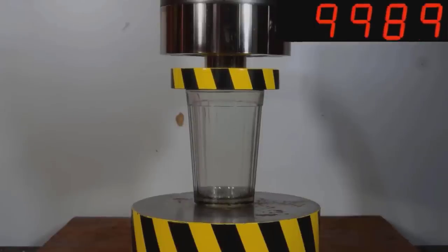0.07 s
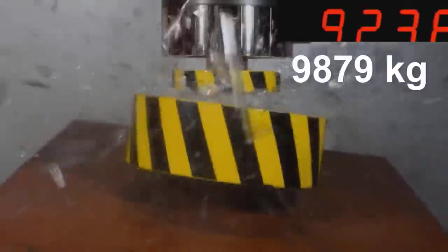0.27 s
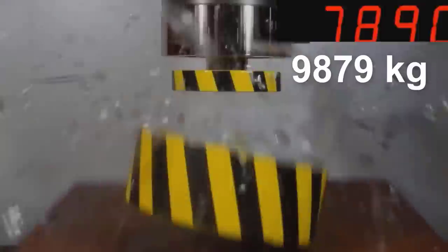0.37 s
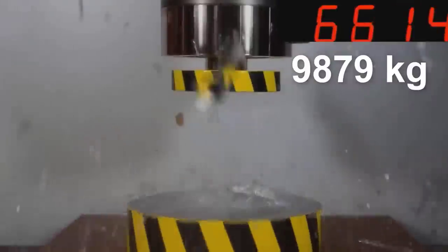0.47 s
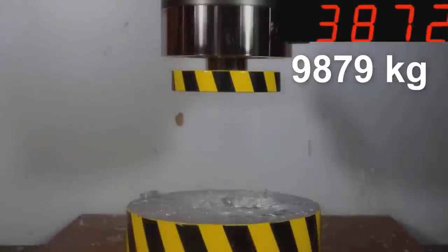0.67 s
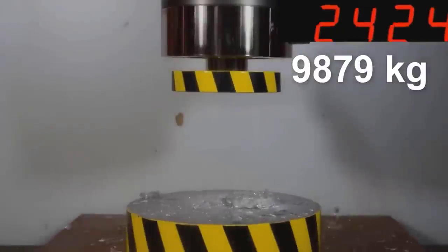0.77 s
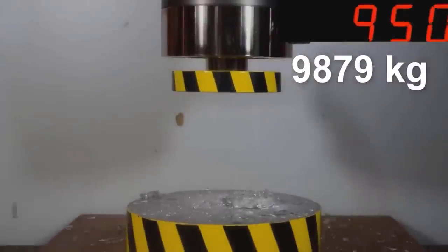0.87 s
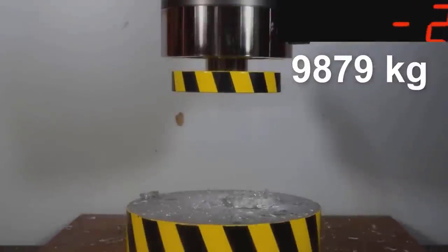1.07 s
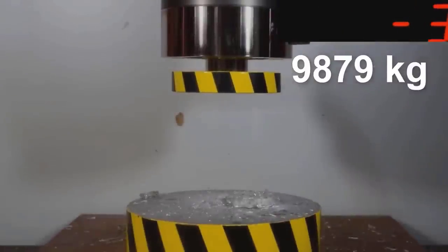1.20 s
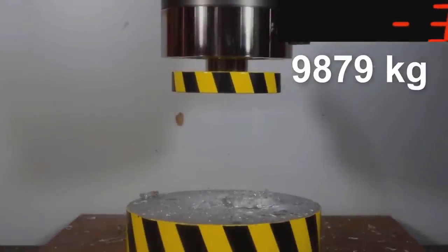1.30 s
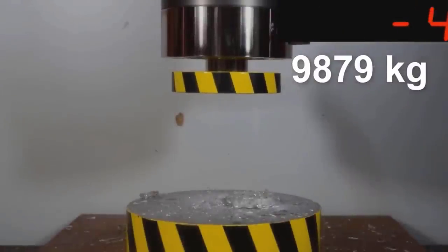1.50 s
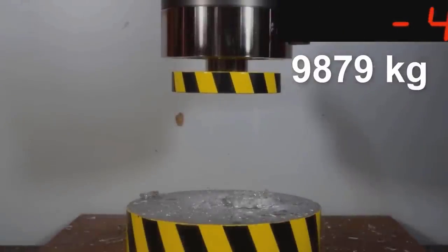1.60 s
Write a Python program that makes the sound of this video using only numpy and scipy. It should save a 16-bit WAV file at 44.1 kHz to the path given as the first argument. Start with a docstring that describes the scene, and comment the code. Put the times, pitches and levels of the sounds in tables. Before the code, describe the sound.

Close microphone in a reverberant workshop: quiet machine hum, sudden violent glass shatter that clips, quick rebounding metallic thuds, a dense bright spray of fragments, then sparse small clicks and faint glassy tinkles.

```python
"""A workshop press hums with soft knocks, then a thick glass cup bursts and overloads the microphone.
Noise bursts make the blows, and wavering tones make the steel frame boom and ring.
Thousands of short grains make a shower of shards, which also rings the platen.
The last pieces tick (bands of noise) and tinkle (single tones) while the room dies away.
Under it all lie the hum (shaped noise) and faint steady tones of the press."""
import sys
import numpy as np
from scipy import signal
from scipy.fft import rfft, irfft
from scipy.io import wavfile
from scipy.ndimage import uniform_filter1d

SR = 44100
rng = np.random.default_rng(int(sys.argv[2]) if len(sys.argv) > 2 else 0)


def file_out(sig):
    """Save sig as 16-bit WAV at sys.argv[1]."""
    # one column per channel
    cols = np.atleast_2d(sig).T
    # limit, then scale
    lim = np.clip(cols, -1, 1)
    pcm = np.round(lim * 32767).astype(np.int16)
    wavfile.write(sys.argv[1], SR, pcm)


N = 72765  # length in samples
T = np.arange(N) / SR  # time in s

# Heavy blows: burst, rebound, heap landing, thud on the bench
# [t/s, bang level/dB, treble tilt/dB per octave, frame ring level/dB, ring centre f/Hz]
BLOWS = [(0.2412, 1, 0, -6, 434), (0.399, -11.5, 2, -7.5, 833), (0.483, -4.5, 2, -14.5, 1610),
         (0.549, -12.5, -5.5, -19.5, 336)]
# Tone colour of every bang [f/Hz, relative level/dB]
BANG_SPECTRUM = [(18, -59), (40, -45), (100, -19.5), (200, -11.5), (350, -3), (540, -11), (905, -10),
                 (1560, -12.5), (4000, -23), (15000, -97)]
BLOW_T60 = 0.13  # s to fall by 60 dB
# Ringing tones of the steel frame [f/Hz, level/dB, time to fall 60 dB/s]
FRAME_MODES = [(222, -9, .4), (290, -11, 1.1), (354, -5, .3), (424, 2, .42), (474, -15, 1.3),
               (705, -13, .8), (793, 0, .4), (933, 3, .4), (1210, -3, .7), (1549, -5, .9), (1598, -4, .6),
               (1847, -5, 1.1), (1869, -8, 1.2), (2073, -11, .3), (2299, -13, .5), (2755, -17, .6)]
RING_FALL_DB = 8  # weaker by this much per octave away from a blow's ring centre
FRAME_WAVER, FRAME_WAVER_S = 0.35, 0.03  # depth of the beating; smoothing time in s

# Loudness of the falling shards over time [t/s, level/dB]
SHOWER_LEVEL = [(.24, -20), (.34, -34), (.39, -57), (.41, -33), (.47, -26.5), (.505, -10.5), (.56, -10.5),
                (.65, -24), (.76, -43.5), (.86, -37.5), (1.04, -37), (1.15, -44.5), (1.3, -49.5),
                (1.45, -54.5), (1.65, -62)]
# Tone colour of the glass grains [f/Hz, relative level/dB per Hz]
GLASS_SPECTRUM = [(700, -15.5), (1700, -0.5), (2700, -4), (3800, -8.5), (5000, -13), (7700, -16),
                  (11000, -17.5), (15500, -40)]
SHARDS_PER_S, SIZE_DB = 6000, 1.5  # mean rate; scale of the random size, in dB
GRAIN_PITCHES, GRAIN_CYCLES = 48, 6.8  # number of pitches; cycles to fade to 1/e
# Ringing tones of the platen [f/Hz, relative level/dB, time to fall 60 dB/s]
PLATEN_MODES = [(3472, -6, .1), (3612, 1, .14), (4027, -1, .15), (4355, -2, .14), (4790, -8, .12),
                (5453, -8, .12), (6207, -7, .13), (6578, -8, .14), (7420, -10, .1), (7682, -8, .14),
                (7784, -3, .12), (8193, -11, .12), (8480, -11, .1), (9453, -9, .1), (9647, -10, .12),
                (9895, -13, .1), (10560, -12, .1), (10870, -13, .1), (11690, -14, .1), (11950, -14, .08),
                (12170, -8, .12)]
PLATEN_DB = -7  # ring against the shower level

# Single pieces that snap or land [t/s, level/dB, centre f/Hz, time to fall 60 dB/s]
TICKS = [(.2455, -12, 8000, .008), (.2848, -11, 9500, .01), (.308, -11, 5800, .01), (.3356, -9, 7000, .012),
         (1.0, -43, 6000, .06), (1.08, -45, 9000, .05), (1.186, -37, 3500, .04), (1.283, -41, 3500, .07),
         (1.363, -38, 3300, .06), (1.368, -38, 1000, .08), (1.379, -36, 950, .08), (1.389, -36, 1050, .05),
         (1.446, -50, 6000, .04), (1.452, -46, 900, .04), (1.521, -43, 3200, .09), (1.521, -52, 9500, .07)]
# Small shards that ring [t/s, level/dB, f/Hz, time to fall 60 dB/s]
TINKLES = [(.4, -26, 11830, .09), (.4, -28, 8926, .1), (.4, -31, 10050, .1), (.78, -50, 12300, .15),
           (.89, -45, 10600, .16), (.93, -42, 11100, .14), (1.002, -45, 8180, .2), (1.005, -46, 10980, .16),
           (1.05, -48, 10700, .1), (1.285, -47, 2800, .08), (1.46, -63, 7600, .14), (1.49, -67, 11500, .14),
           (1.524, -52, 3680, .06), (1.6, -66, 10700, .14)]
TICK_WIDTH = 0.95  # band runs from centre / 1.95 to centre * 1.95
RISE_SHARE = 0.054  # rise time as a share of the 60 dB fall time
TINKLE_WAVER, TINKLE_WAVER_S = 0.7, 0.006  # depth of the beating; smoothing time in s

# Tone colour of the press hum [f/Hz, relative level/dB per Hz]
HUM_SPECTRUM = [(25, -46), (80, -23), (150, -4.5), (230, -9.5), (380, 3.5), (600, -7), (960, -8),
                (1900, -13), (3200, -27.5), (7000, -34.5), (12000, -45), (14000, -64)]
HUM_DB = -60
# Soft knocks of the press under load [t/s, level over the hum/dB, halved in strength when added]
KNOCKS = [(0.016, 16), (0.087, 16), (0.174, 12)]
KNOCK_S = 0.038  # s for a knock to fade to 1/e
# Steady tones of pump and electronics [f/Hz, rms level/dB]
WHINE = [(156, -79.5), (404, -71.5), (958, -67.5), (6783, -98), (12026, -86)]

# How slowly the room dies away [f/Hz, time to fall 60 dB/s]
ROOM_T60 = [(60, 0.43), (120, 0.2), (220, 1.03), (500, 1.45), (1500, 1.076), (4000, 0.87), (8000, 0.63),
            (15000, 0.54)]
BANG_WET_DB, RING_WET_DB, SHARD_WET_DB = 0, -12, -5.5  # share of each sound sent to the room
CEILING, KNEE = 0.23, 3.4  # overload limit; a higher knee makes a sharper bend
LOW_CUT_HZ, HIGH_CUT_HZ = 23, 15150


def blows():
    """Each blow is a wide burst of noise and rings the frame, most near its own centre."""
    bang = np.zeros(N)
    for start, db, tilt_db, _, _ in BLOWS:
        bang += amp(db) * coloured(BANG_SPECTRUM, tilt_db) * dying(start, BLOW_T60)

    ring = np.zeros(N)
    for hz, mode_db, t60 in FRAME_MODES:
        struck = np.zeros(N)
        for start, _, _, ring_db, centre_hz in BLOWS:
            octaves_away = abs(np.log2(hz / centre_hz))
            struck += amp(ring_db - RING_FALL_DB * octaves_away) * dying(start, t60)
        ring += amp(mode_db) * struck * wavering(hz, FRAME_WAVER, FRAME_WAVER_S)
    return bang, ring


def shower():
    """Thousands of short glassy grains of random pitch; their taps also ring the platen."""
    burst_time = BLOWS[0][0]
    level = amp(np.interp(T, *np.transpose(SHOWER_LEVEL))) * (T > burst_time)

    # Each tap has a random size (capped), moment and sign.
    size = amp(SIZE_DB * np.minimum(rng.exponential(1, N), 4))
    happens = rng.random(N) < SHARDS_PER_S / SR
    taps = size * happens * rng.choice([-1, 1], N)

    pitch_number = rng.integers(0, GRAIN_PITCHES, N)
    pitches = np.geomspace(GLASS_SPECTRUM[0][0], GLASS_SPECTRUM[-1][0], GRAIN_PITCHES)
    grains = np.zeros(N)
    t = T[:2048]
    for k, hz in enumerate(pitches):
        fade = np.exp(-t * hz / GRAIN_CYCLES)
        grain = amp(read(GLASS_SPECTRUM, hz)) * hz * fade * np.sin(2 * np.pi * hz * t)
        grains += signal.oaconvolve(taps * (pitch_number == k), grain)[:N]

    ring = rung(level * taps, PLATEN_MODES)
    ring *= np.linalg.norm(level) / np.linalg.norm(ring)
    return level * evened(grains) + amp(PLATEN_DB) * ring


def pieces():
    """Ticks are short bands of noise, tinkles single dying tones that waver."""
    out = np.zeros(N)
    for start, db, hz, t60 in TICKS:
        edges = [hz / (1 + TICK_WIDTH), min(hz * (1 + TICK_WIDTH), 20000)]
        band = signal.butter(2, edges, "bandpass", fs=SR)
        noise = evened(signal.lfilter(*band, rng.standard_normal(N)))
        out += amp(db) * dying(start, t60) * rising(start, RISE_SHARE * t60) * noise
    for start, db, hz, t60 in TINKLES:
        tone = wavering(hz, TINKLE_WAVER, TINKLE_WAVER_S)
        out += amp(db) * dying(start, t60) * rising(start, RISE_SHARE * t60) * tone
    return out


def press():
    """Low noise hum that swells with soft knocks, and faint steady tones."""
    swell = np.ones(N)
    for start, db in KNOCKS:
        # ln(1000) turns the time to 1/e into the time to fall 60 dB.
        swell += amp(db) * dying(start, KNOCK_S * np.log(1000)) * rising(start, 0.005) / 2
    out = amp(HUM_DB) * coloured(HUM_SPECTRUM) * swell
    for hz, db in WHINE:
        # The root of 2 turns an rms level into a peak.
        out += np.sqrt(2) * amp(db) * np.sin(2 * np.pi * (hz * T + rng.random()))
    return out


def room(x):
    """Echoes as a noise tail of energy 1, each band dying at its own speed."""
    hz, t, bands = signal.stft(rng.standard_normal(N), SR, nperseg=256)
    fade = amp(-60 * t / read(ROOM_T60, hz)[:, None])
    tail = signal.istft(bands * fade, SR, nperseg=256)[1][:N]
    tail *= rising(0, 0.0063)
    return signal.fftconvolve(x, tail / np.linalg.norm(tail))[:N]


def rung(x, modes):
    """The sound of x striking an object: every mode is a dying sine."""
    response = np.zeros(N)
    for hz, db, t60 in modes:
        response += amp(db) * dying(0, t60) * np.sin(2 * np.pi * hz * T)
    return signal.fftconvolve(x, response)[:N]


def wavering(hz, depth, smooth_s):
    """A tone whose strength and phase drift, as close modes beating."""
    width = int(smooth_s * SR)
    drift = uniform_filter1d(rng.standard_normal((2, N)), width)
    drift = uniform_filter1d(drift, width)
    strength = 1 + depth * (evened(drift[0]) + 1j * evened(drift[1]))
    return (strength * np.exp(2j * np.pi * hz * T)).imag


def coloured(spectrum, tilt_db=0.):
    """Noise of rms 1 with the given spectrum, tilted by tilt_db per octave around 1 kHz."""
    hz = np.fft.rfftfreq(N, 1 / SR)
    tilt = tilt_db * np.log2(hz / 1000 + 0.0089)  # the small number avoids log of 0
    gain = amp(read(spectrum, hz) + tilt)
    return evened(irfft(rfft(rng.standard_normal(N)) * gain, N))


def dying(start, t60):
    """Silent before start, then falling 60 dB in t60 seconds."""
    return (T >= start) * amp(-60 * np.maximum(T - start, 0) / t60)


def rising(start, rise_s):
    """A straight climb from 0 to 1 that softens an attack."""
    return np.clip((T - start) / rise_s, 0, 1)


def read(points, hz):
    """Look up a table between its points, on a logarithmic frequency scale."""
    f, value = np.transpose(points)
    return np.interp(np.log(hz + 1), np.log(f + 1), value)


def amp(db):
    """Turn decibels into a plain multiplier."""
    return 10 ** (np.asarray(db) / 20)


def evened(x):
    """Scale a sound to rms 1."""
    return x / np.sqrt(np.mean(x ** 2) + 1e-20)


def scene():
    """Add the direct sounds, their room echoes and the press."""
    bang, ring = blows()
    glass = shower() + pieces()
    sent = amp(BANG_WET_DB) * bang + amp(RING_WET_DB) * ring + amp(SHARD_WET_DB) * glass
    return (bang + ring + glass + room(sent) + press())[None]


def record(dry):
    """The input overloads at a rounded ceiling; then the bass is cut and the top removed."""
    clipped = dry / (1 + abs(dry / CEILING) ** KNEE) ** (1 / KNEE)
    low_cut = signal.butter(1, LOW_CUT_HZ, "highpass", fs=SR)
    cut = signal.lfilter(*low_cut, clipped)
    high_cut = signal.firwin(511, HIGH_CUT_HZ, window=("kaiser", 9), fs=SR)
    return signal.oaconvolve(cut, high_cut[None], "same")


dry = scene()
out = record(dry)
file_out(out)
```